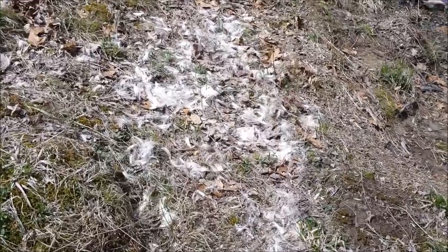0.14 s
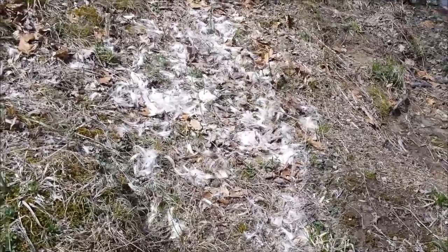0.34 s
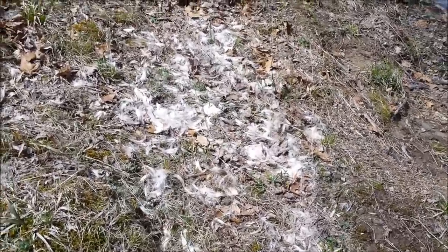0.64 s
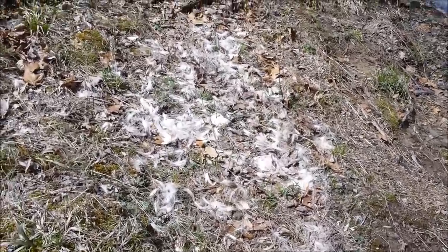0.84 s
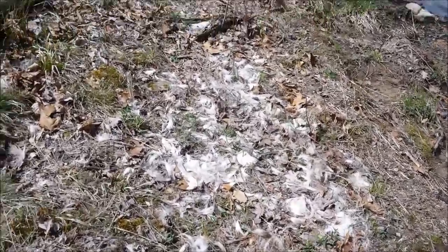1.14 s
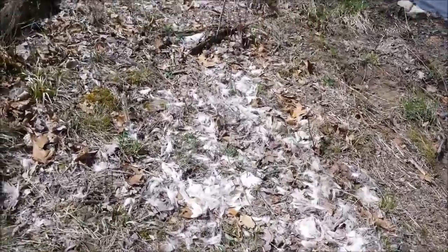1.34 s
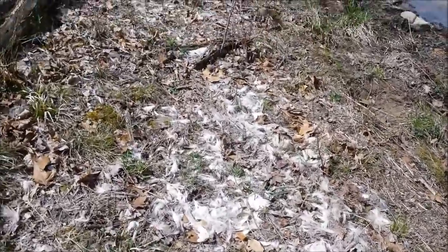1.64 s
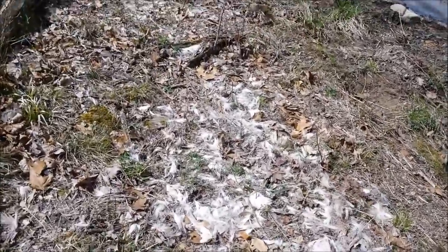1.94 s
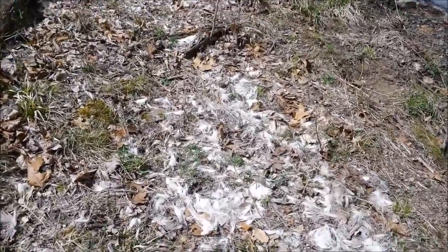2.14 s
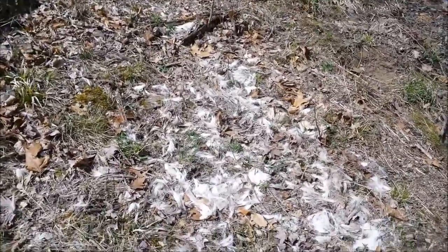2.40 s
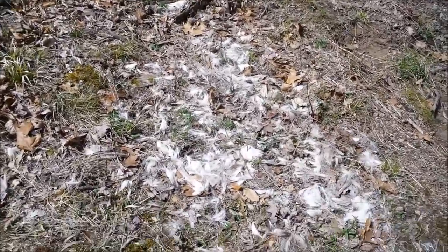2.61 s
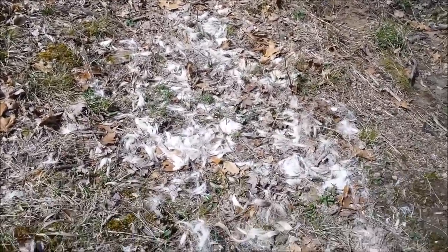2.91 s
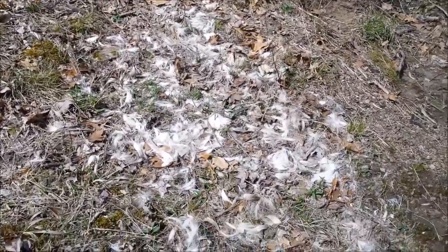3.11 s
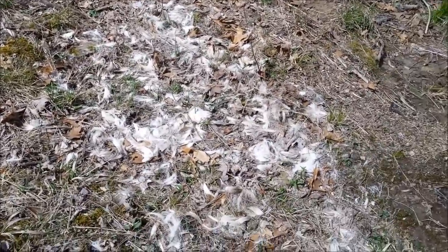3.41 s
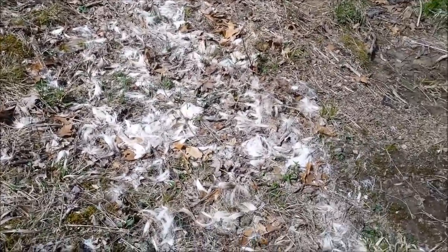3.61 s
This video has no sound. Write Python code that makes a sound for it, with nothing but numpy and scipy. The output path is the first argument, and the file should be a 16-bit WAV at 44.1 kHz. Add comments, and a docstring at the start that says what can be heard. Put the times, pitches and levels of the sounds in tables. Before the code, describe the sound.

Three slow footsteps crunch dry leaves and snap twigs, with wind buffeting the microphone.

```python
"""A twig cracks and dry leaves crunch: three slow steps through litter and grass on a woodland trail,
close to the microphone. Then the walker stands and the litter barely stirs.
Each step crushes thousands of tiny leaf folds and snaps a few stalks and twigs.
A breeze buffets the microphone, mostly its left port, over a faint hiss and a thin electronic whine."""
import sys
import numpy as np
from scipy import signal
from scipy.fft import rfft, irfft, next_fast_len
from scipy.io import wavfile
from scipy.ndimage import uniform_filter1d

SR = 44100
rng = np.random.default_rng(int(sys.argv[2]) if len(sys.argv) > 2 else 0)


def to_wav(sig):
    """Store sig (one row per channel, or 1-D mono) as 16-bit WAV at the path in sys.argv[1].

    Samples outside -1..1 are clipped; the rate is SR.
    """
    pcm = np.clip(np.atleast_2d(sig), -1, 1) * 32767
    pcm = np.round(pcm).astype(np.int16)
    wavfile.write(sys.argv[1], SR, pcm.T)  # frames by channels


N = 165375
T = np.arange(N) / SR

# Crackle on the trail as each foot presses down: (time [s], relative level [dB])
FIRST_STEP = [(0, -39), (.05, -39.5), (.16, -34.5), (.19, -38), (.26, -33.5), (.29, -34), (.325, -26),
              (.35, -24.5), (.38, -28), (.45, -36.5), (.48, -43), (.6, -51), (.8, -56)]
SECOND_STEP = [(.8, -51.5), (.855, -58.5), (.878, -47), (.894, -44.5), (.901, -50), (.943, -50),
               (.957, -44), (.975, -46.5), (.982, -50.5), (1.045, -45.5), (1.065, -36.5), (1.085, -39.5),
               (1.15, -35.5), (1.185, -40.5), (1.23, -36), (1.3, -41), (1.36, -53)]
SECOND_ROLL_OFF = [(1.25, -59), (1.32, -43), (1.37, -40.5), (1.43, -43), (1.48, -44.5), (1.51, -51),
                   (1.6, -62.5)]
THIRD_STEP = [(1.8, -55.5), (1.862, -44), (1.873, -34), (1.885, -30), (1.93, -28.5), (1.98, -36),
              (2.01, -40), (2.04, -37), (2.09, -41.5), (2.14, -47.5), (2.25, -59), (2.35, -62.5),
              (2.6, -70)]
STANDING_SHUFFLE = [(2.3, -61.5), (2.62, -67), (2.95, -74), (3.05, -56), (3.2, -58.5), (3.45, -63),
                    (3.55, -47.5), (3.6, -56.5), (3.75, -62)]
# Tone of the litter under each foot: (frequency [Hz], relative level [dB])
FIRST_TONE = [(350, -39), (600, -16.5), (1030, -14), (1120, -12), (1580, -14), (2180, -10), (2730, -9),
              (3340, -11), (3810, -15.5), (5680, -9.5), (7020, -2), (7810, -8), (11600, -18),
              (12800, -15.5), (14400, -16.5)]
SECOND_TONE = [(400, -0.5), (850, -3), (1300, -3.5), (2000, -1), (2650, -2.5), (3450, -11), (4500, -3.5),
               (6000, -3), (7000, 3), (8000, 2.5), (9000, 1.5), (11200, -8.5), (14400, -7.5)]
ROLL_OFF_TONE = [(290, -71), (500, -9.5), (1020, -9), (1500, -12.5), (1930, -9), (3070, -7.5),
                 (4010, -15.5), (4360, -11), (7030, -3), (9310, -10.5), (14400, -17)]
THIRD_TONE = [(350, -43), (600, -5.5), (676, -11.5), (994, -14.5), (1330, -18), (1790, -17), (1910, -22),
              (2070, -16), (2630, -18), (3080, -12.5), (3760, -19), (6150, -11.5), (7610, -2),
              (10600, -14.5), (14400, -18)]
# Width of each step at the microphone: (frequency [Hz], side minus mid [dB])
FIRST_WIDTH = [(60, -1), (180, 10), (550, -7), (1650, -2.5), (4970, -2.5), (15000, -10.5)]
SECOND_WIDTH = [(60, 7), (180, -19), (550, -25), (1650, 1), (4970, -2), (15000, -6.5)]
THIRD_WIDTH = [(60, 1), (150, 6), (380, -25), (950, -3.5), (2380, 7), (5980, -22), (15000, 2)]


def footsteps():
    """Three steps press the litter, the second rolling off the foot; a quiet shuffle follows."""
    first = crunch(FIRST_STEP, FIRST_TONE, FIRST_WIDTH, gain_db=0, low_hz=463, scatter_db=1)
    second = crunch(SECOND_STEP, SECOND_TONE, SECOND_WIDTH, gain_db=1, low_hz=302, scatter_db=.5)
    roll = crunch(SECOND_ROLL_OFF, ROLL_OFF_TONE, SECOND_WIDTH, gain_db=0, low_hz=400, scatter_db=-2)
    third = crunch(THIRD_STEP, THIRD_TONE, THIRD_WIDTH, gain_db=0, low_hz=507, scatter_db=.5)
    shuffle = crunch(STANDING_SHUFFLE, THIRD_TONE, SECOND_WIDTH, gain_db=-4, low_hz=400, scatter_db=4)
    return first + second + roll + third + shuffle


def crunch(pressure, tone, width, gain_db, low_hz, scatter_db, leaves=48, ring_share=.31):
    """Leaf folds break faster and louder under pressure; each leaf has a pitch of its own."""
    times, levels = np.transpose(pressure)
    span = (T >= times[0]) & (T <= times[-1])
    db = np.interp(T[span], times, levels)
    n = len(db)
    folds_per_s = 4000 * from_db(.6 * (db + 35))
    breaks = rng.random(N)[:n] < folds_per_s / SR
    strength = from_db(scatter_db * np.minimum(rng.exponential(1, N)[:n], 4.5))
    clicks = breaks * strength * rng.choice([-1, 1], N)[:n]
    leaf_of_click = rng.integers(0, leaves, N)[:n]
    folds = 0
    for k, hz in enumerate(np.linspace(1000, 14000, leaves)):
        puff = fracture(t60_s=.0054)
        ring = signal.lfilter(*signal.iirpeak(hz, Q=hz / 1200, fs=SR), puff)
        leaf = rms_one(puff) + ring_share * rms_one(ring)
        own_clicks = clicks * (leaf_of_click == k)
        folds = folds + signal.oaconvolve(own_clicks[None], leaf, axes=1)[:, :n]
    mid, side = colour(folds, tone, low_hz)
    crackle = evened(to_stereo(mid, colour(side, width)), span_s=.089)
    out = np.zeros((2, N))
    out[:, span] = crackle * from_db(db + gain_db + crumple_db()[span])
    return out


def crumple_db(per_s=70, decay_s=.004, jump_db=4.5):
    """Whole leaves give way now and then: the crackle jumps up in level and dies back."""
    jumps = rng.random(N) < per_s / SR
    decays = signal.lfilter([1], [1, -np.exp(-1 / (decay_s * SR))], jumps + 1e-18)
    swell = np.minimum(decays, 1)
    return jump_db * (swell - swell.mean())


def fracture(t60_s, size=600):
    """A tiny break: two unrelated puffs of noise, mid and side, that die at once."""
    return rng.standard_normal((2, size)) * from_db(-60 * np.arange(size) / SR / t60_s)


# Lean of the litter as the microphone faces it: (frequency [Hz], left minus right [dB])
LITTER_LEAN = [(600, 4.5), (2000, 5), (3200, 1), (5000, -0.5), (8500, 0), (12000, -4.5), (14000, -5.5)]


def to_stereo(mid, side):
    """Mid and side to left and right: the lower crackle leans left, the very top right."""
    lean = np.array(LITTER_LEAN)
    return np.array([colour(mid + side, lean * [1, .5]), colour(mid - side, lean * [1, -.5])])


# Brittle leaves and stalks snapping underfoot: (time [s], relative level [dB])
STALK_SNAPS = [(0.06, -23.5), (0.099, -27), (.2128, -24), (.2465, -18), (0.256, -22), (0.271, -14),
               (.279, -16), (.3052, -13), (0.35, -9), (.3715, -14), (0.433, -23), (0.496, -28), (.561, -31),
               (0.8665, -27), (0.9458, -25), (.9565, -27.5), (0.963, -24), (1.103, -23), (1.152, -25),
               (1.1674, -21), (1.2695, -23.5), (1.3347, -18), (1.365, -29), (1.373, -26), (1.826, -24.5),
               (1.9265, -18), (1.964, -21), (2.035, -11.5), (2.0914, -26), (2.191, -35), (2.294, -35),
               (2.8741, -33), (3.05, -41), (3.2136, -42), (3.258, -43), (3.6298, -31.5), (3.72, -34)]
# Twigs breaking on the trail:
# (time [s], relative crack level [dB], relative knock level [dB], knock pitch [Hz], knock t60 [s])
TWIG_BREAKS = [(.0195, -26.5, -31.5, 1510, 0.0078), (.109, -42, -26, 1400, 0.0081),
               (0.1436, -27, -26.5, 1330, 0.0058), (.1622, -17, -29, 1200, 0.0065),
               (0.5367, -21.5, -35, 1820, 0.0047), (0.6674, -43, -35, 1480, .006),
               (.861, -48, -37, 1240, 0.011), (.8815, -28, -28, 1340, 0.0057),
               (1.0611, -26.5, -23, 1820, 0.016), (1.1422, -39, -31, 600, 0.0074),
               (1.192, -20.5, -17, 1850, 0.01), (1.198, -36, -24, 2130, 0.011),
               (1.2063, -15.5, -20.5, 1480, 0.018), (1.2249, -15, -25.5, 1400, 0.014),
               (1.242, -25, -25, 1900, 0.01), (1.2815, -39, -25.5, 1860, .009),
               (1.288, -18.5, -28, 1470, 0.0051), (1.4156, -30, -9, 1350, 0.0054),
               (1.849, -43, -33, 1300, .006), (1.882, -12, -26, 2010, 0.0046),
               (3.1249, -35, -45, 2030, 0.019)]
# Modes of a twig: (multiple of the pitch [ratio], relative level [dB], share of the t60 [ratio])
WOOD_MODES = [(1, -4.5, 1), (1.45, 1.5, 0.52), (2.15, -13, 1)]


def snaps(size=1000, ground_lag_s=.000099, ground_share=.46, left_lag_s=.00004, pan_db=3):
    """Leaves and stalks give a bright crack; twigs add a woody knock that rings briefly."""
    cracks, knocks = np.zeros((2, N + SR)), np.zeros(N + SR)
    t = np.arange(size) / SR
    breaks = [(at, crack(db - .5, low_hz=1670)) for at, db in STALK_SNAPS]
    for at, crack_db, knock_db, hz, t60 in TWIG_BREAKS:
        breaks.append((at, crack(crack_db - 1.5, low_hz=.66 * hz)))  # thinner twig, thinner crack
        start = int(at * SR)
        for multiple, mode_db, share in WOOD_MODES:
            decay = from_db(knock_db + mode_db - 6.5 - 60 * t / (share * t60))
            knocks[start:start + size] += decay * np.sin(2 * np.pi * hz * multiple * t)
    for at, sound in breaks:
        start = int(at * SR)
        cracks[:, start:start + sound.shape[1]] += sound
    knocks = butter(knocks[:N], 1040, "high")
    knocks += ground_share * np.interp(T - ground_lag_s, T, knocks)  # also arrives by way of the ground
    left = np.interp(T - left_lag_s, T, knocks) * from_db(pan_db)
    right = knocks * from_db(-pan_db)
    mid, side = cracks[:, :N]
    return to_stereo(mid, side * from_db(-6)) + np.array([left, right])


# Tone of a dry stalk cracking nearby: (frequency [Hz], relative level [dB])
CRACK_TONE = [(700, -2), (2000, -9), (3600, -26), (4800, -9), (6000, -9), (7200, 9), (9000, 0.5),
              (11000, -17.5), (14400, -1.5)]


def crack(peak_db, low_hz, ring_share=.36, ring_range_hz=(6200, 11500)):
    """A bright fracture, mid and side; every stalk rings at a pitch of its own."""
    puff = fracture(t60_s=.0065)
    ring = signal.lfilter(*signal.iirpeak(rng.uniform(*ring_range_hz), Q=10, fs=SR), puff)
    snap = colour(rms_one(puff), CRACK_TONE, low_hz)
    out = rms_one(snap) + ring_share * rms_one(ring)
    return out / np.abs(out).max() * from_db(peak_db)


# Breeze on the microphone's ports: (time [s], left strength [dB], right strength [dB])
PORT_BREEZE = [(0, -48, -57), (.1, -51, -36), (.2, -45, -56), (.5, -40, -61), (.75, -44, -43.5),
               (.9, -46, -54), (1.2, -49.5, -60), (1.4, -42.5, -51.5), (1.7, -47.5, -53),
               (1.87, -38.5, -39), (1.93, -29, -49), (2.2, -33, -44.5), (2.5, -32.5, -41),
               (2.88, -26.5, -37), (3.02, -33, -39.5), (3.27, -33, -44.5), (3.55, -37.5, -34),
               (3.75, -39, -34)]
# Swells of turbulence at the left port: (time [s], half length [s], strength [dB])
LEFT_GUSTS = [(0.064, 0.03, -33), (0.148, 0.029, -25.5), (0.274, 0.0078, -26), (0.351, 0.014, -26.5),
              (0.629, 0.022, -27.5), (0.673, 0.016, -24), (0.769, 0.03, -25), (1.911, 0.008, -23),
              (2.025, 0.015, -23.5), (2.053, 0.0042, -20), (2.151, 0.0077, -21.5), (2.222, 0.015, -20),
              (2.256, 0.0097, -19), (2.329, 0.028, -22), (2.415, 0.023, -21), (2.706, 0.015, -23.5),
              (2.844, 0.02, -20.5), (2.917, 0.018, -25.5), (3.356, 0.026, -21.5), (3.431, 0.015, -23.5),
              (3.646, 0.02, -24)]
# Rumble at the ports at the reference strength:
# (frequency [Hz], relative level per Hz [dB], growth with strength [dB/dB])
WIND_RUMBLE = [(25, -35.5, 0), (47, -11, 0.54), (83.2, 3.5, 0.96), (133.4, -2.5, 1), (207, -9, 1.53),
               (306, -22, 1.75), (516, -37.5, 1.1), (890, -56, 0.7), (1400, -69, 4.5)]


def wind(reference_db=-28, gain_db=.5, flutter_db=2.5, flutter_s=.013, top_hz=720):
    """Turbulence, separate at each port; stronger eddies reach higher in pitch."""
    times, left_db, right_db = np.transpose(PORT_BREEZE)
    left_power = from_db(np.interp(T, times, left_db)) ** 2
    for at, half_s, db in LEFT_GUSTS:
        left_power += from_db(db) ** 2 * np.exp(-((T - at) / half_s) ** 2)
    strength_db = np.array([10 * np.log10(left_power), np.interp(T, times, right_db)])
    for port_db, knots in zip(strength_db, rng.standard_normal((2, 4000))):
        port_db += flutter_db * np.interp(T / flutter_s, np.arange(len(knots)), knots)
    edges = 20 * 2 ** np.arange(0, 6.6, .5)  # half octaves from 20 Hz
    centres = np.sqrt(edges[1:] * edges[:-1])
    gains = from_db(at_hz(WIND_RUMBLE, centres)) * np.sqrt(centres)
    gains /= np.linalg.norm(gains)
    white = rng.standard_normal((2, 2, N + SR))  # neighbouring bands take unrelated noise
    rumble = 0
    for k, hz in enumerate(centres):
        band = butter(white[k % 2], edges[k:k + 2], "band")[:, SR:]
        band = np.array([evened(port, span_s=.027 + .77 / hz) for port in band])
        growth_db = at_hz(WIND_RUMBLE, hz, column=2) * (strength_db - reference_db)
        rumble = rumble + band * gains[k] * from_db(reference_db + gain_db + growth_db)
    return butter(rumble, top_hz, "low", order=4)


# Single eddies thumping the left port: (time [s], half width [s], relative peak [dB])
LEFT_EDDIES = [(0.638, .0024, -16), (0.6486, 0.0017, -15), (0.761, 0.0033, -13), (0.785, .0024, -16),
               (0.7958, .0018, -13), (2.154, 0.0014, -16.5), (2.219, .0014, -15.5), (2.227, .0013, -14),
               (2.25, 0.0014, -9.5), (2.263, 0.0015, -15), (2.291, .0015, -10.5), (2.424, 0.0014, -11),
               (2.6, 0.0016, -10), (2.691, 0.0016, -13), (2.7251, 0.0024, -14), (2.8353, 0.0011, -16.5),
               (2.844, 0.0011, -18), (2.86, 0.0011, -15), (2.9008, 0.0018, -10.5), (3.358, 0.0018, -8),
               (3.369, 0.0021, -10)]


def buffets(gain_db=1, port_low_hz=56):
    """An eddy crossing the port is one pressure pulse between shallow troughs; narrow ones are sharper."""
    pressure = 0
    for at, half_s, db in LEFT_EDDIES:
        u = (T - at) / half_s
        pulse = (1 - u ** 2) / (1 + u ** 2) ** 2
        pressure = pressure + rng.choice([-1, 1]) * from_db(db + gain_db) * pulse
    return butter(pressure, port_low_hz, "high") * np.array([[1], [0]])


# Hiss behind the trail: (frequency [Hz], relative level [dB])
HISS_TONE = [(200, 16.5), (700, 2.5), (1400, -1), (2400, 1.5), (4000, -3), (6000, 0.5), (7300, 6),
             (9000, 1.5), (11000, -1.5), (14400, -5.5)]
# Thin whine in the microphone's right channel: (frequency [Hz], level [dB])
WHINE_PARTIALS = [(7374, -74), (8040, -74), (8710, -76), (9375, -74), (10050, -73), (10720, -75)]


def hiss_and_whine(left_db=-56, right_db=-55, jitter_hz=450):
    """Steady hiss with a faint electronic whine, its partials blurred by pitch jitter."""
    hiss = rms_one(colour(rng.standard_normal((2, N)), HISS_TONE, low_hz=59.7))
    whine = 0
    for hz, db in WHINE_PARTIALS:
        cycles = np.cumsum(hz + jitter_hz * rng.standard_normal(N)) / SR
        whine = whine + from_db(db) * np.sin(2 * np.pi * cycles)
    return hiss * from_db([[left_db], [right_db]]) + whine * np.array([[0], [1]])


def from_db(db):
    """Decibels to gain."""
    return 10 ** (np.asarray(db) / 20)


def rms_one(x):
    """Scale to rms 1."""
    return x / np.sqrt(np.mean(x ** 2) + 1e-20)


def at_hz(points, hz, column=1):
    """Read a table on a log-frequency axis."""
    table = np.array(points)
    return np.interp(np.log(np.maximum(hz, 1)), np.log(table[:, 0]), table[:, column])


def butter(x, hz, kind, order=2):
    """Low-, high- or band-pass filter."""
    return signal.sosfilt(signal.butter(order, hz, kind, fs=SR, output="sos"), x)


def colour(x, points, low_hz=0):
    """Causal filter with the given spectrum and a second-order roll-off below low_hz."""
    size = 2 * next_fast_len(x.shape[-1] // 2 + 2048)
    hz = np.arange(size // 2 + 1) * SR / size + 1
    gain = from_db(at_hz(points, hz)) / (1 + (low_hz / hz) ** 2)
    cepstrum = irfft(np.log(gain))
    cepstrum[1:size // 2] *= 2  # fold to minimum phase
    cepstrum[size // 2 + 1:] = 0
    return irfft(rfft(x, size) * np.exp(rfft(cepstrum)))[..., :x.shape[-1]]


def evened(x, span_s):
    """Hold the running rms at 1."""
    power = np.mean(np.atleast_2d(x) ** 2, axis=0)
    for _ in range(2):
        power = uniform_filter1d(power, max(int(span_s * SR), 2))
    return x / np.sqrt(np.abs(power) + 1e-12)


def scene():
    """Steps and snaps on the trail, wind on the microphone, hiss behind."""
    return footsteps() + snaps() + wind() + buffets() + hiss_and_whine()


def record(dry):
    """The top is cut steeply above 14.5 kHz."""
    return signal.sosfilt(signal.ellip(10, .3, 70, 14520, fs=SR, output="sos"), dry)


dry = scene()
out = record(dry)
to_wav(out)
```